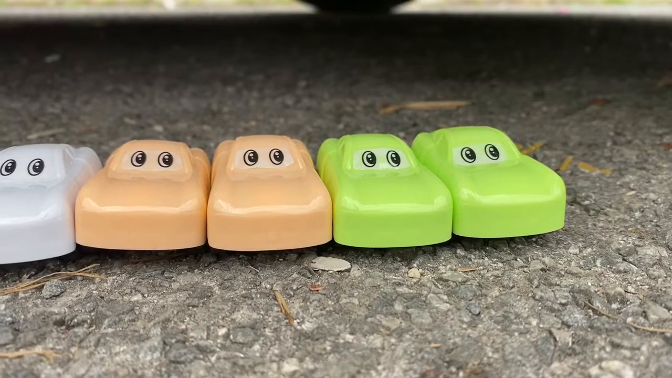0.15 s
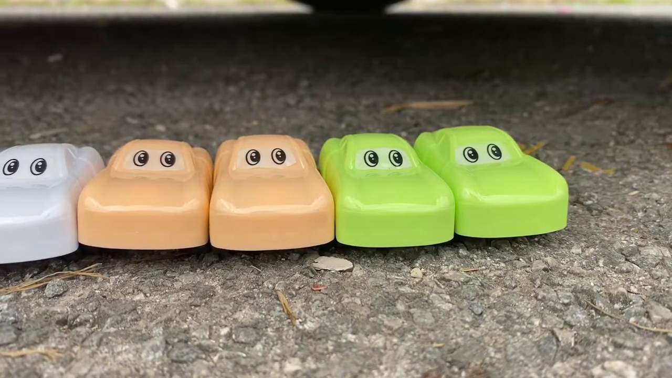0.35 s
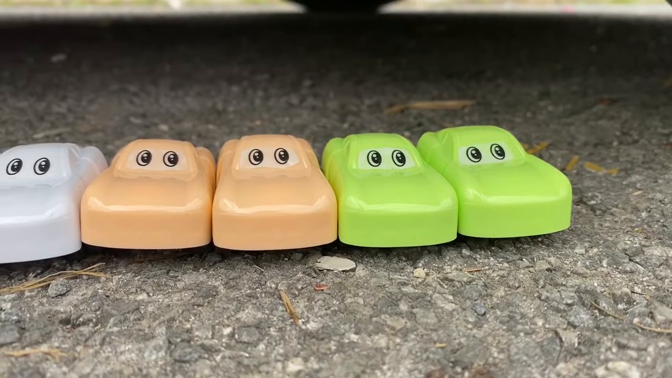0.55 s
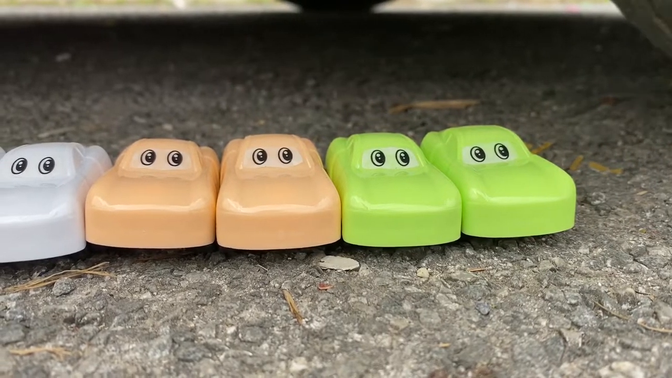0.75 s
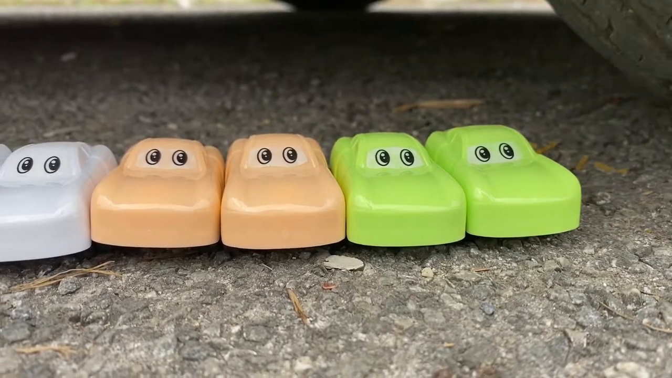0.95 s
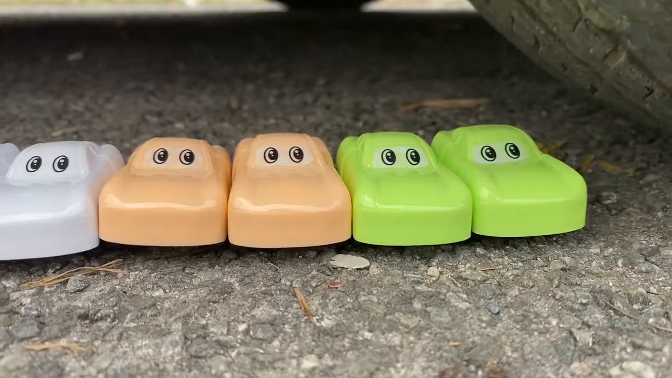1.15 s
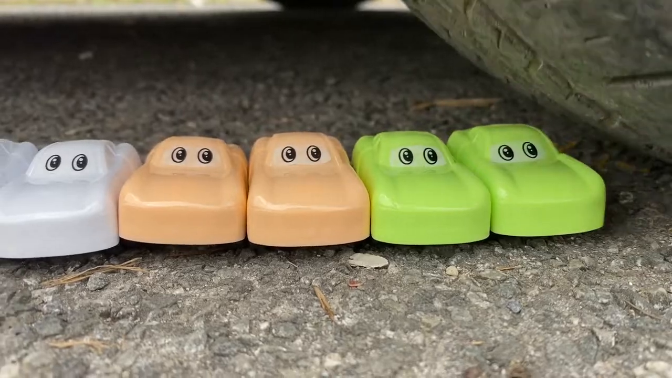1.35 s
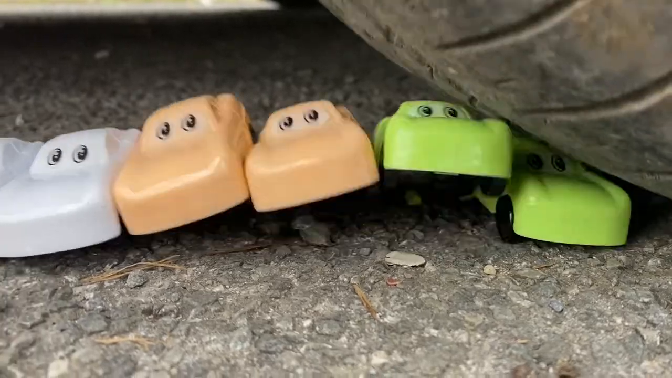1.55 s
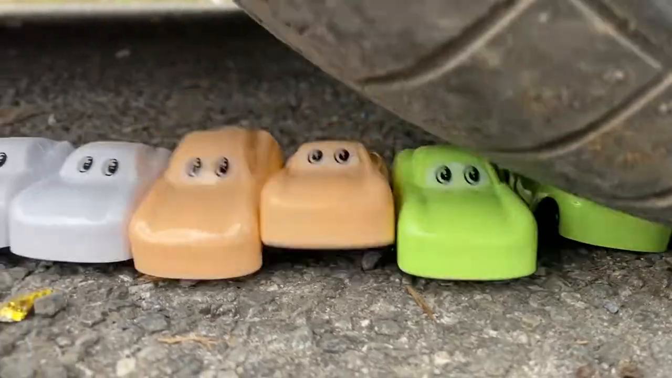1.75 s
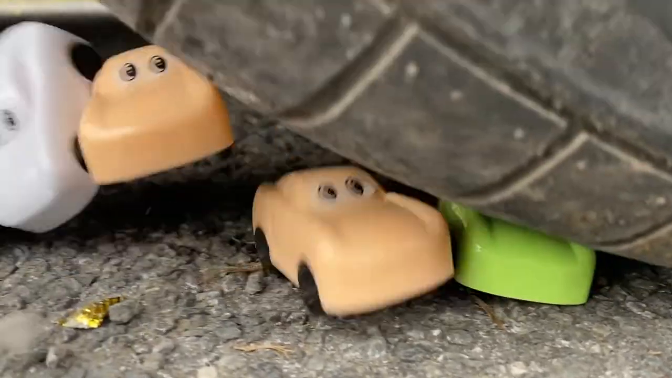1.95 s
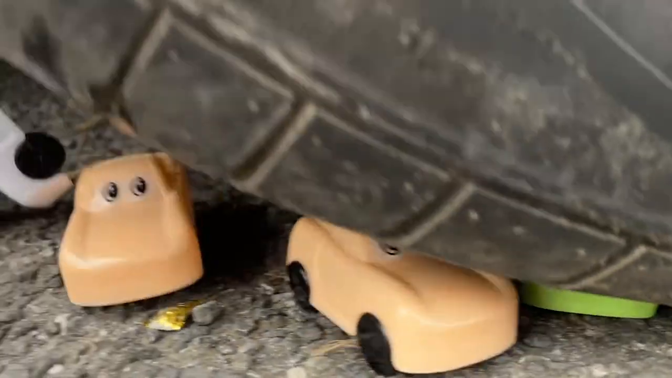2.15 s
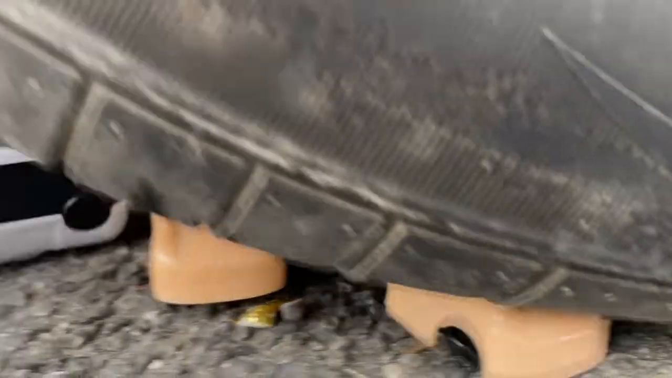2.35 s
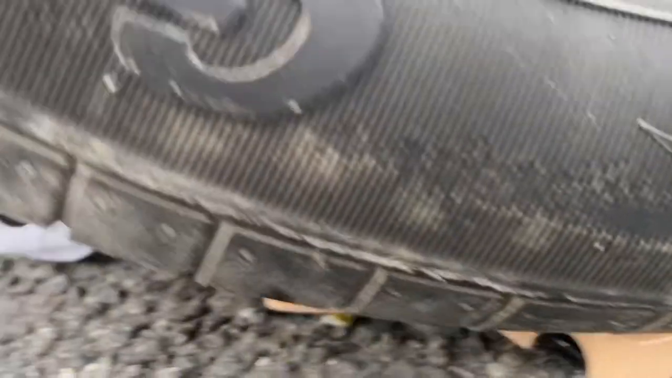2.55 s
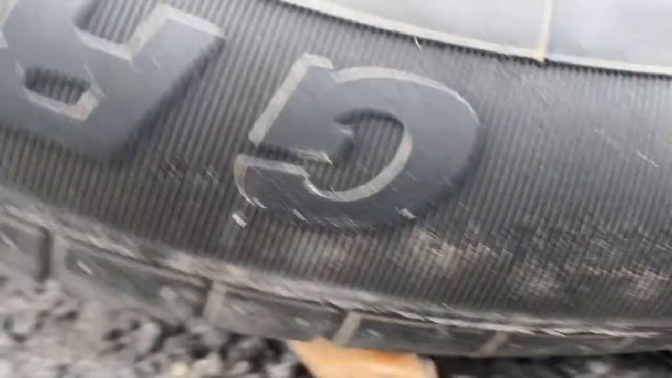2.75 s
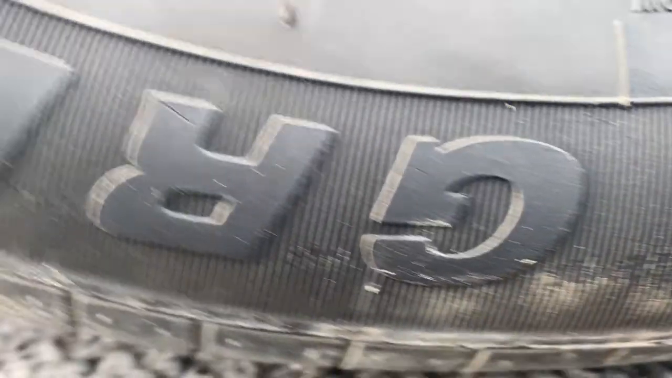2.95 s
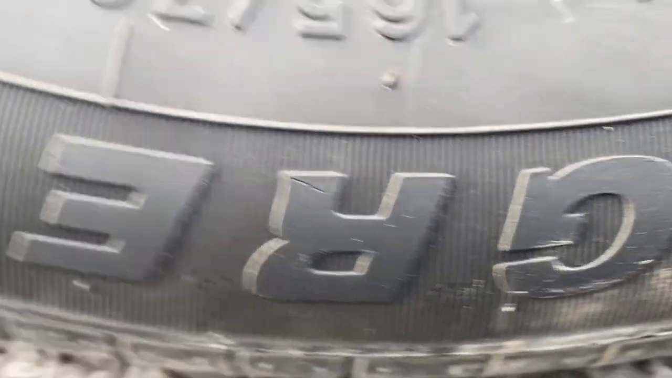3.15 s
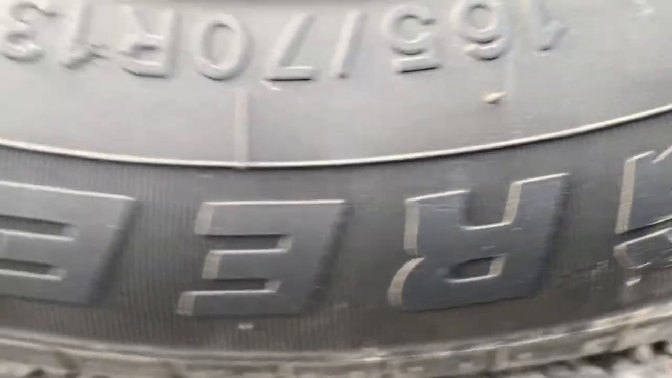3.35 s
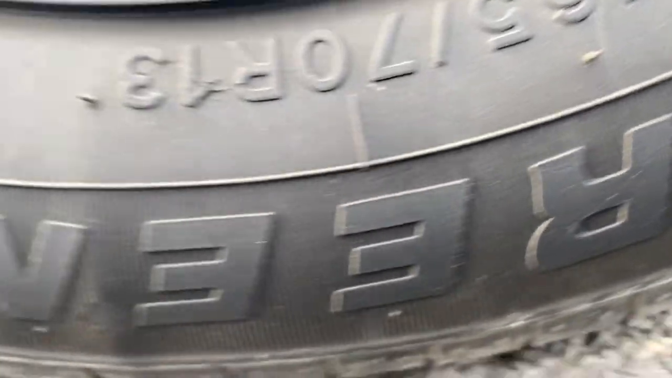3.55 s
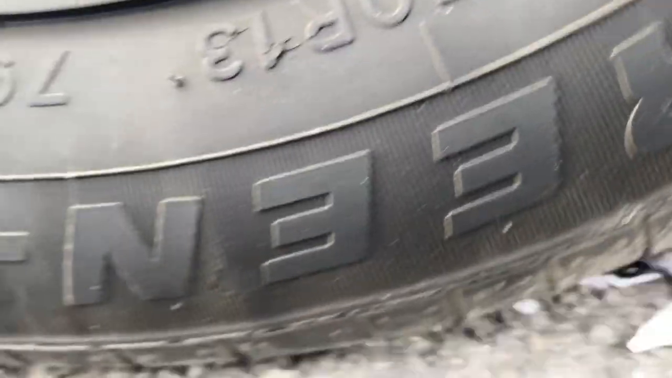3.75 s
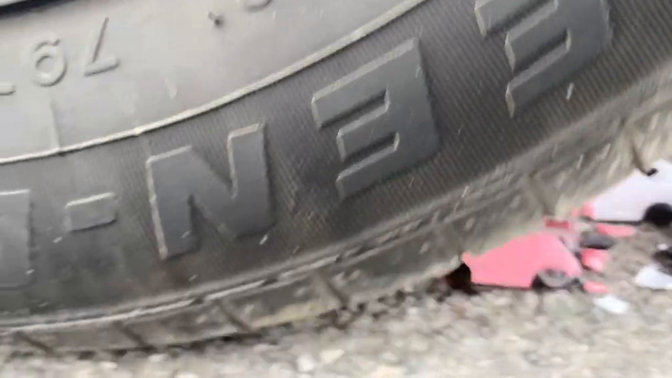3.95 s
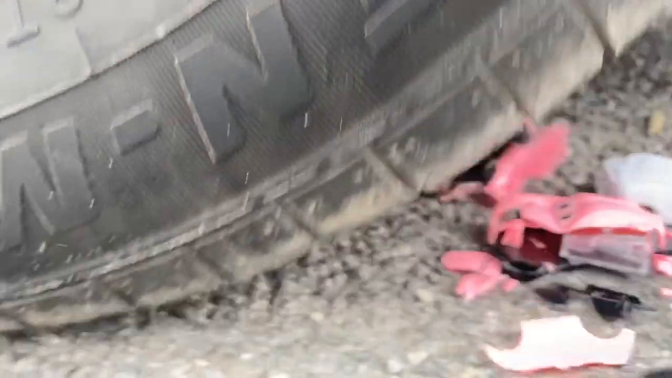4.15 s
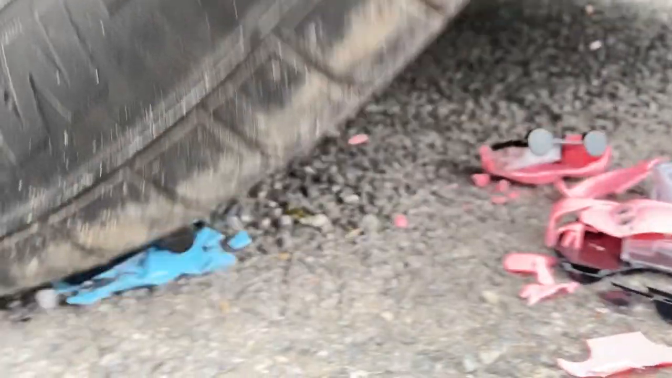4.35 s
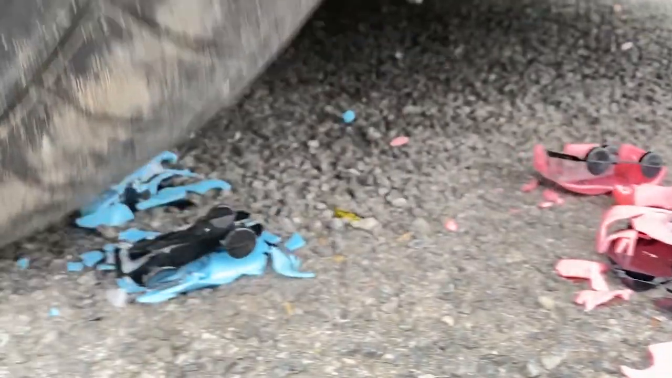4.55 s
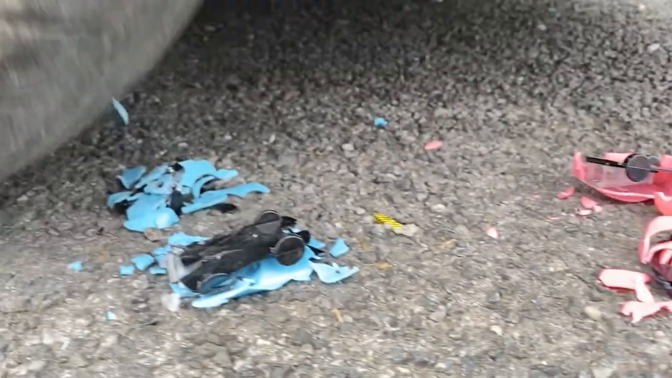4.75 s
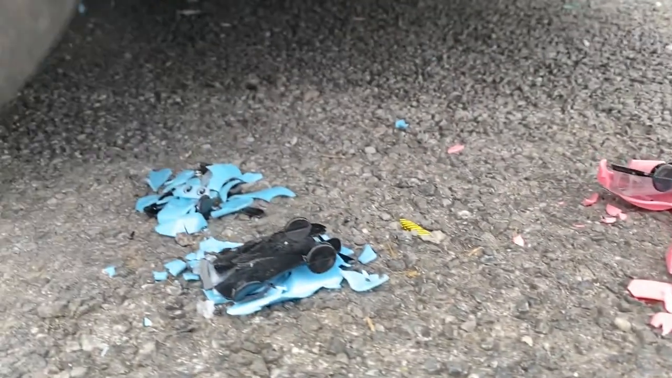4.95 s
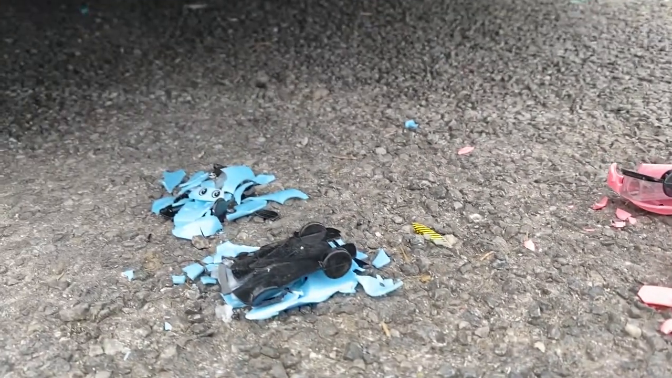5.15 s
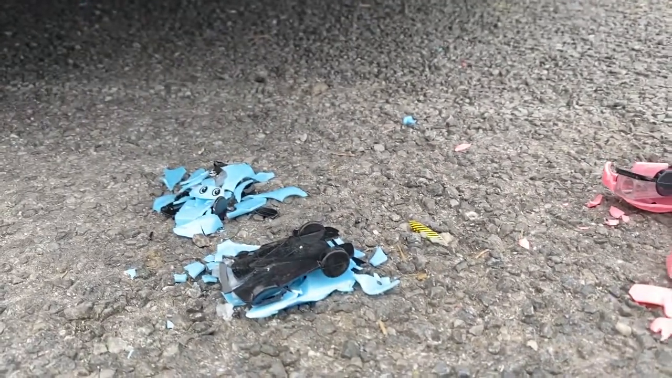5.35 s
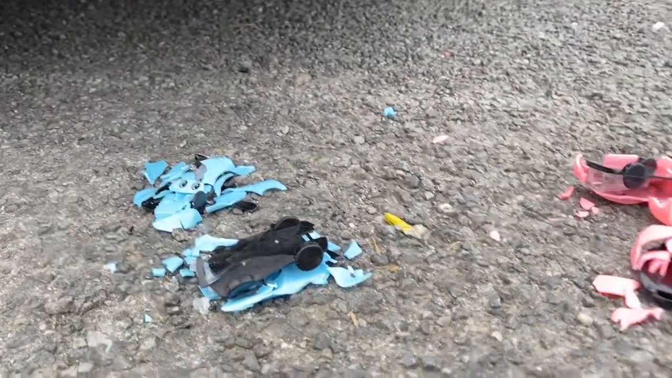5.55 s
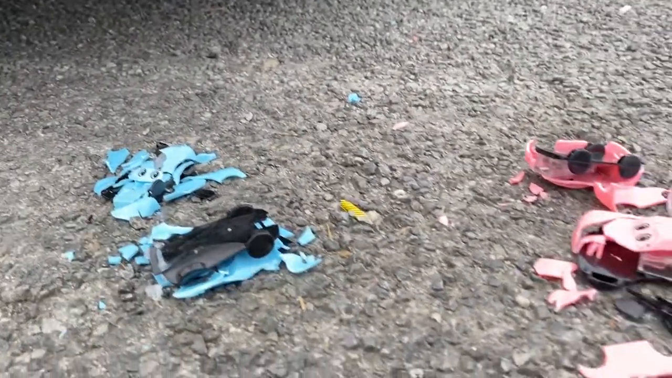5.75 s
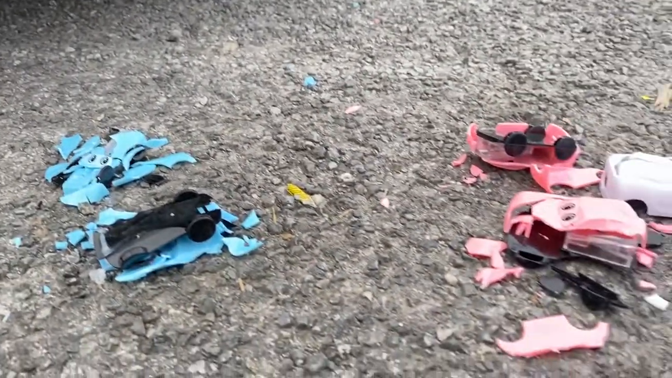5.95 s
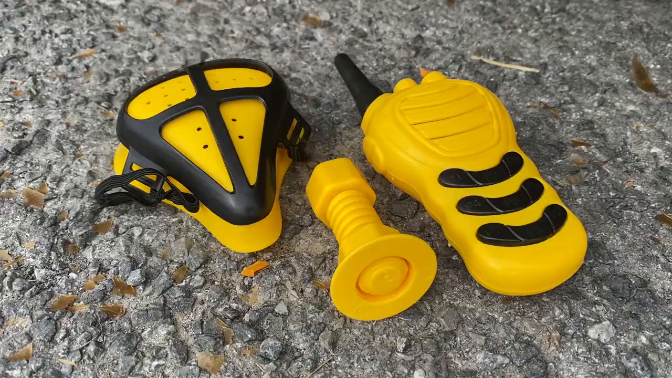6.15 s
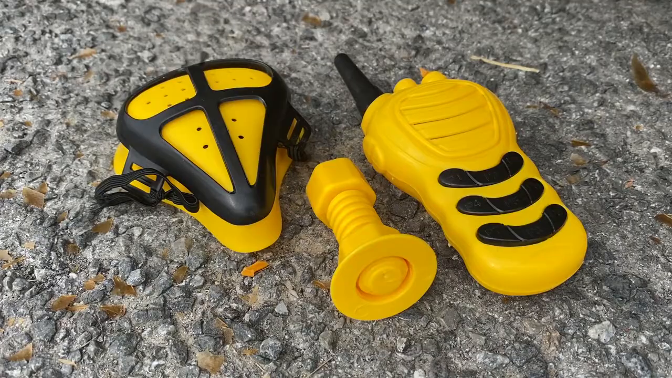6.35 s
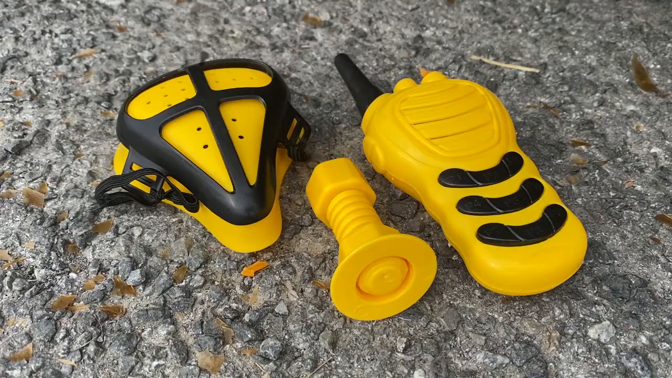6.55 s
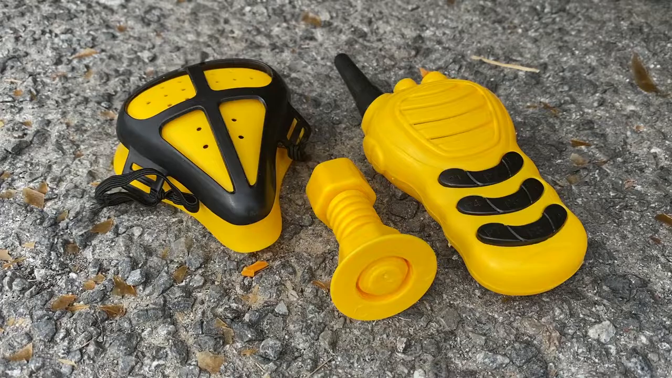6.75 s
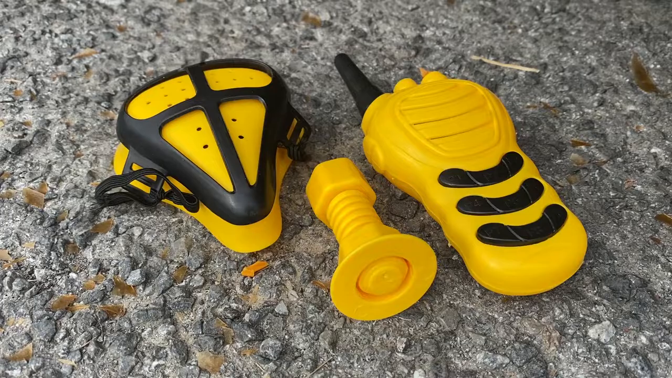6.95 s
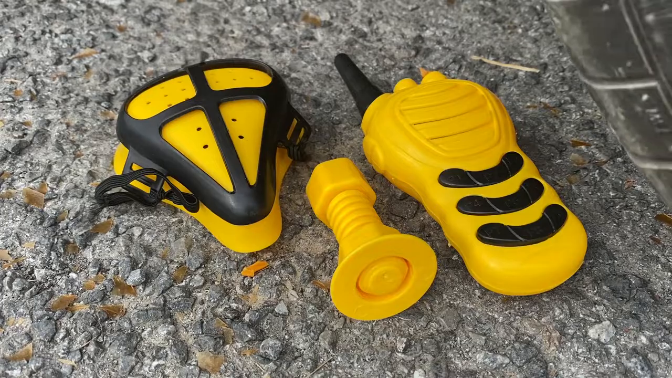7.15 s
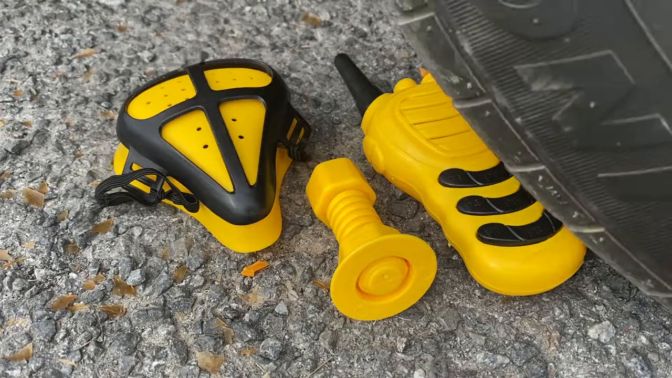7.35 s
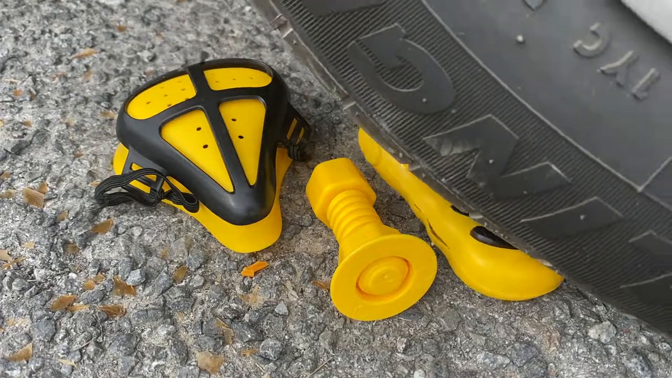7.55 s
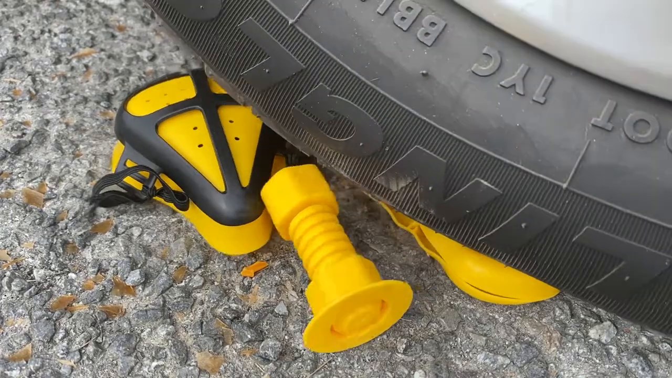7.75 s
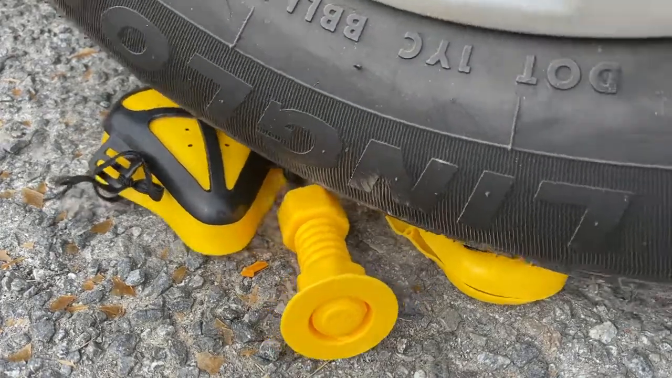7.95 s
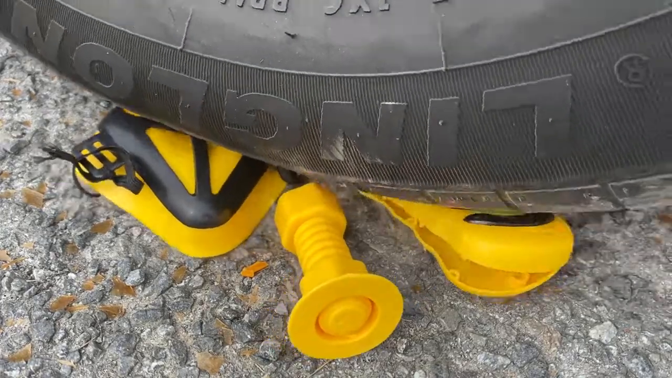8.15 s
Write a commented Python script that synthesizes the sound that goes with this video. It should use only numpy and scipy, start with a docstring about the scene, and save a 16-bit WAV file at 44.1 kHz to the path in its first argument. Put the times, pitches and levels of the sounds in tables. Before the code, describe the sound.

Outdoors on asphalt, close stereo microphone. A car idles in slowed, dull motion with a soft mechanical hiss. The tyre creaks on hollow plastic toys, then breaks them in a dense run of snaps, hollow booms, low thumps and crackling splinters. It thins to a quiet dull background with small pieces bouncing and ticking. A sudden cut brings a brighter, faster idle, one or two ticks, a brief squeak and a shorter burst of sharp cracks.

```python
"""Car tyre over hollow plastic toys

On asphalt, a car idles near a two-port microphone, then its tyre crushes plastic toys: plastic snaps,
hollow shells boom, the tyre thumps, and splinters crackle. Shaped noise makes the engine, breaks and debris;
sine waves make the firing, creaks, booms, thumps, knocks and hums. The first passage plays at half speed and
gradually changes to a quieter, duller background during the crushing; the second, at full speed, starts on the idle."""
import sys
import numpy as np
from scipy import signal
from scipy.fft import rfft, irfft
from scipy.io import wavfile
from scipy.ndimage import uniform_filter1d

SR = 44100
rng = np.random.default_rng(int(sys.argv[2]) if len(sys.argv) > 2 else 0)


def waveform_to_disk(signal):
    """Save audio, clipped to [-1, 1], as 16-bit WAV at the path in sys.argv[1]."""
    frames = np.transpose(np.atleast_2d(signal))
    scaled = np.clip(frames, -1, 1) * 32767
    samples = np.round(scaled).astype(np.int16)
    wavfile.write(sys.argv[1], SR, samples)


N = 361575

# Passages: start_s, end_s, playing_speed (share of full), top_hz (stopband edge as heard),
# scatter_rad (phase spread between ears), engine_cycle_hz (as heard), firing_s (moment of one firing)
PASSAGES = [(0, 6.145, 0.5007, 10270, 0.85, 10.52, .06), (6.151, 8.2, 0.99, 17500, 0.26, 21.37, 6.18)]
SECOND_START_S = PASSAGES[1][0]

# Engine noise, sinking during the crushing: time_s, level_db (before resonances and ports)
ENGINE_NOISE_LEVEL = [(0, -31.5), (1.45, -33), (1.75, -48.5), (2.1, -35), (2.35, -48), (3.4, -45),
                      (4.3, -46), (4.42, -60), (4.7, -61.5), (6.142, -64), (6.152, -35.5), (7.45, -36.5),
                      (7.7, -45), (7.95, -55)]
# Engine firing waves: multiple (of the engine cycle), level_db (relative)
FIRING_ORDERS = [(3, -9), (4, -5), (5, -3), (6, 0)]
# Idling engine noise at half speed: pitch_hz (as heard), density_db (per Hz, relative)
IDLING_COLOUR = [(30, -13.5), (60, -7.5), (130, -7.5), (350, -11.5), (700, -14), (1200, -21.5), (2200, -25),
                 (3600, -28), (6200, -36), (7500, -27.5), (9000, -30)]
# Duller background at half speed: pitch_hz (as heard), density_db (per Hz, relative)
DULL_COLOUR = [(30, -4), (60, 1.5), (130, -8), (250, -1.5), (450, -4), (1000, -13), (1500, -13.5),
               (6200, -25), (7500, -17), (9000, -20)]
# Narrow resonances in the engine noise: pitch_hz (as heard), added_gain_db, passage (0 half speed, 1 full)
WHINES = [(1046, 1.5, 0), (1232, 4.1, 1)]
# Firing level in each passage: (level_db at IDLING_DB, dB lost for each dB the noise sinks below it)
FIRING_FOLLOW, IDLING_DB = [(-38, 1.8), (-33, 0.68)], -33.5
DULLING_MIDDLE_S = 3.0   # middle of the gradual change to the duller background

# Breaks given a snap and a falling knock, no shell boom: start_s, snap_peak_db (before the ports)
TICKS = [(0.813, -9), (1.565, -11.5), (1.5747, -2), (1.618, -6), (1.7441, -13), (1.8177, -19), (1.909, -9),
         (1.9552, -11.5), (2.2, -17), (2.237, -13.5), (2.2548, -3.5), (2.301, -8), (2.326, -14.5),
         (2.4171, -3), (2.425, -6.5), (2.4651, -3.5), (2.522, -7), (2.5693, -2.5), (2.619, -4.5),
         (2.624, -9), (2.6409, 0), (2.668, -11.5), (2.706, -8), (2.766, -5), (2.877, -4.5), (2.8912, 1.5),
         (2.9257, 0.5), (2.967, 7), (3.018, -8), (3.06, -16.5), (3.072, -15.5), (3.1128, 0.5),
         (3.129, -0.5), (3.137, -1.5), (3.1832, -16), (3.2049, 0), (3.2319, 2.5), (3.266, -4), (3.348, -13),
         (3.5961, -3.5), (3.675, -2.5), (3.686, 4), (3.7, 5), (3.7111, 0), (3.8238, 3), (3.8446, 0.5),
         (3.8994, -14.5), (3.9185, -0.5), (3.9775, -1), (4.0044, -1), (4.043, -16), (4.266, -28),
         (6.871, -16), (7.249, -11.5), (7.5068, -2.5), (7.5496, -0.5), (7.595, -21), (7.6154, 1),
         (7.675, 3.5), (7.791, -10), (7.8304, -6.5), (8.014, -26), (8.146, -21.5), (8.165, -18),
         (8.174, -21.5)]
# Plastic shells breaking: start_s, snap_peak_db (before the ports), shell_peak_db (before the left-right
# tilt), shell_pitch_hz (as heard, before tuning scatter), thump_db (before its rise and decay)
CRACKS = [(1.53, 1.5, -12.5, 230, -10), (1.6484, -0.5, -10.5, 315, -23.5), (1.874, 1.5, -10.5, 306, -21.5),
          (1.9689, -4.5, -17.5, 436, -21.5), (2.015, -1, -7, 382, -23), (2.0616, -4, -10, 434, -24),
          (2.1105, 4, -5, 383, -18.5), (2.3792, 1, -11, 249, -20), (2.494, -4.5, -28, 300, -20.5),
          (2.541, 3, -15.5, 588, -20.5), (2.682, -8.5, -18, 565, -27), (2.738, 4.5, -9.5, 375, -33),
          (2.823, 6, -29, 336, -21), (3.0798, 0.9, -25, 332, -31), (3.1003, 3.5, -9, 497, -35.5),
          (3.289, 4.5, -8, 310, -32), (3.4293, 1, -13.5, 343, -27), (3.4964, -3.5, -7.5, 433, -30.5),
          (3.76, 5, -18.5, 485, -32), (4.094, -0.5, -6, 370, -21), (4.1927, 2, -15, 334.6, -31.5),
          (7.6372, 1, -23, 330, -15), (7.7311, 3, -14.5, 650, -12.5), (7.8942, 0, -11, 900, -11.5),
          (8.0518, 0, -13.5, 795, -12.5)]
# Snap colour at full speed: pitch_hz, density_db (per Hz, relative)
SNAP_COLOUR = [(130, -26.5), (400, -8), (800, -4.5), (1600, -11), (4800, -10.5), (13000, -14.5),
               (16000, -7.5)]
PIECE_HZ, PIECE_DB = (2180, 8960), 6   # range of a piece's favoured pitch at full speed, added gain
# Knock against its snap; settled pitch and extra pitch at the start, at half speed; t60 at half speed
KNOCK_DB, KNOCK_SETTLED_HZ, KNOCK_EXTRA_HZ, KNOCK_T60_S = -14.5, 243, 900, 0.031
SHED_DB, SHED_T60_S = (-32.5, -55), 0.27   # splinters against the breaks in each passage, dying time

# Rubber creaking on plastic before it gives: start_s, end_s, slip_hz, partials (count),
# level_db (before swell and grip), loudest (share of its length)
CREAKS = [(1.474, 1.492, 862, 1, -17.5, 0.25), (1.5, 1.536, 779, 4, -16.5, 0.83),
          (7.428, 7.461, 1000, 2, -27, 0.59), (7.475, 7.495, 800, 2, -23, .2)]
# Hollow shell modes: multiple (of shell pitch), level_db (relative), t60_cycles
SHELL_MODES = [(.62, -6, 9.0), (1, 1, 12.5), (1.55, -1.5, 20)]

# Faint hums late in the first passage: start_s, pitch_hz (as heard), level_db (at the start, before waver), t60_s
HUMS = [(4.25, 133.4, -56, 2.66), (4.3, 409, -66.5, 26)]
# Pieces settling afterwards: start_s, peak_db (before the ports), pitch_hz (as heard)
SETTLING = [(4.251, -38, 7090), (4.485, -34.5, 5240), (4.503, -36.5, 3670), (5.65, -47, 937),
            (5.792, -42.5, 1073)]
SETTLE_CYCLES = 26   # t60 of the first scratch, in cycles of the piece
ROCK_DB, ROCK_T60_S = -14.5, 0.35   # softer rattle that lasts on
BOUNCE_S, BOUNCE_GAP_S, BOUNCE_SHRINK = 4.282, .0222, .74   # first touch, first gap, ratio of gaps
BOUNCE_DB, BOUNCE_LOSS_DB = -19.5, 2   # first touch, loss at each next touch

# Likeness of the two microphone ports: pitch_hz (at full speed), likeness (0 to 1)
PORT_LIKENESS = [(120, 0.92), (1000, 0.4), (3000, 0.25), (6000, 0.35), (7200, 0.77), (11000, 0.95)]
LAG_FROM_HZ, LAG_S = 6160, .000254   # left-port lag and where it begins, at full speed
CUTOFF_HZ = 16950   # stopband edge for both passages


def amp(db):
    """Decibels to gain."""
    return 10 ** (np.asarray(db) / 20)


def rms_one(x):
    """Scale to rms 1."""
    return x / np.sqrt(np.mean(x ** 2) + 1e-20)


def peak_one(x):
    """Scale to height 1."""
    return x / np.max(np.abs(x))


def at_hz(points, hz):
    """Read a table on a log-frequency axis."""
    table_hz, values = np.array(points).T
    return np.interp(np.log(hz + 1), np.log(table_hz), values)


def coloured(spectrum, size, speed=1, ripple_db=0):
    """Two unrelated noises of one colour, with random resonant peaks; rms 1."""
    hz = np.fft.rfftfreq(size, 1 / SR) / speed
    ripple = np.interp(hz, np.linspace(0, SR, 220), rng.standard_normal(220))
    shape = amp(at_hz(spectrum, hz) + ripple_db * ripple) * (hz > 25)
    white = rng.standard_normal((2, size))
    return rms_one(irfft(rfft(white) * shape, size))


def resonance(x, hz, q):
    """A single resonance of peak gain 1; q is pitch over bandwidth."""
    return signal.lfilter(*signal.iirpeak(hz, q, SR), x)


def add(into, s, sound):
    """Mix a two-row sound in at s seconds."""
    i = round(s * SR)
    into[:, i:i + sound.shape[1]] += sound[:, :N - i]


def passage_at(s):
    """Which passage a moment falls in."""
    return (np.asarray(s) >= SECOND_START_S).astype(int)


def speed_at(s):
    """Playing speed and phase scatter between ears at a moment."""
    passage = PASSAGES[int(s >= SECOND_START_S)]
    return passage[2], passage[4]


def firing(cycle_hz, firing_s):
    """Waves at multiples of the engine cycle, each firing sweeping upward, the low ones first; all waver."""
    t, out = np.arange(N) / SR, 0
    for k, db in FIRING_ORDERS:
        waver = np.interp(t, np.linspace(0, t[-1], 70), rng.standard_normal(70))
        sweep_rad = 0.33 * (k - 6) ** 2
        out = out + amp(db + 1.8 * waver) * np.cos(2 * np.pi * k * cycle_hz * (t - firing_s) - sweep_rad)
    return rms_one(out)


def whining(noise, passage):
    """Narrow resonances, 25 Hz wide, lifted out of the engine noise."""
    for hz, db, heard_in in WHINES:
        if round(heard_in) == passage:
            noise = noise + amp(db) * resonance(noise, hz, hz / 25)
    return noise


def engine(firing_db, noise_db):
    """Firing waves over mechanical noise; the half-speed noise changes gradually to a duller colour."""
    t = np.arange(N) / SR
    full = t >= SECOND_START_S
    dulling = np.clip((t - DULLING_MIDDLE_S) / 3 + .5, 0, 1)
    idling_noise = coloured(IDLING_COLOUR, N, ripple_db=3.5)
    dull_noise = coloured(DULL_COLOUR, N)
    slow_noise = whining(np.sqrt(1 - dulling) * idling_noise + np.sqrt(dulling) * dull_noise, passage=0)
    full_noise = whining(coloured(IDLING_COLOUR, N, 1.957, ripple_db=2.5), passage=1)
    noise = np.where(full, full_noise, slow_noise)
    tones = np.where(full, firing(*PASSAGES[1][5:]), firing(*PASSAGES[0][5:]))
    return amp(noise_db) * noise + amp(firing_db) * tones * [[1], [.6]]   # rows: shared, apart


def piece(x, speed):
    """A broken piece lifts one broad resonance, drawn by chance."""
    hz = speed * np.exp(rng.uniform(*np.log(PIECE_HZ)))
    return x + amp(PIECE_DB) * resonance(x, hz, 4.5)


def snaps(table, tear_s, tail_db):
    """Each break is a quick run of uneven fractures for a few milliseconds, then dies away under the car."""
    out = np.zeros((2, N))
    for s, snap_db, *_ in table:
        speed = speed_at(s)[0]
        t = np.arange(5000) / SR * speed   # time at full speed
        tear = tear_s * rng.uniform(.8, 1.3)
        # spiky from one half millisecond to the next
        fractures = np.repeat(amp(3.33 * np.minimum(rng.exponential(1, 250), 3)), 20)
        fall_db = -6.0 * t / tear - 60 * np.maximum(t - tear, 0) / 0.0061
        burst = fractures * (1 - np.exp(-t / .0004)) * amp(fall_db)
        crack = coloured(SNAP_COLOUR, 5000, speed, ripple_db=2.0)
        echo = coloured(SNAP_COLOUR, 5000, .45 * speed, ripple_db=3.5)
        dull_echo = signal.lfilter([1], [1, -.6], echo)
        tail = amp(tail_db - 60 * t / speed ** 0.6 / 0.069) * dull_echo
        snap = piece(burst * crack + np.sqrt(fractures) * tail, speed)
        add(out, s, amp(snap_db) * peak_one(snap))
    return out


def knocks():
    """A break jolts the toy: a dull knock whose pitch drops fast."""
    out = np.zeros((2, N))
    for (s, db), (tuning, strength, ear) in zip(TICKS, rng.standard_normal((len(TICKS), 3))):
        speed, scatter = speed_at(s)
        t = np.arange(4000) / SR * 2 * speed   # time at half speed
        drop_cycles = KNOCK_EXTRA_HZ * 0.00403 * (1 - np.exp(-t / .004))
        cycles = amp(2.5 * tuning) * (KNOCK_SETTLED_HZ * t + drop_cycles)
        level = amp(db + KNOCK_DB + 2 * strength - 60 * t / KNOCK_T60_S)
        wave = np.sin(2 * np.pi * cycles + scatter * ear * np.array([[1], [0]]))
        add(out, s, level * wave * (1 - np.exp(-t / 0.0037)))
    return out


def shedding():
    """Every break leaves splinter energy that dies away; returned as gain."""
    energy = np.zeros(N)
    for s, snap_db, *_ in CRACKS + TICKS:
        energy[round(s * SR)] = amp(2 * (snap_db + SHED_DB[passage_at(s)]))
    decay = amp(-120 / (SHED_T60_S * SR))   # energy falls at twice the dB of gain
    return np.sqrt(signal.lfilter([1], [1, -decay], energy + 1e-18))


def splinters(level):
    """Four pieces' fragments crackle at random over a faint hiss that rises with each break and dies away."""
    strength = amp(4.0 * np.minimum(rng.exponential(1, (4, N)), 3))
    clicks = (rng.random((4, N)) < 60 / SR) * strength   # about 60 a second for each piece
    bursts = signal.lfilter([1], [1, -amp(-60 / (0.005 * SR))], clicks) + 0.012
    crackle = sum(b * piece(piece(coloured(SNAP_COLOUR, N, 0.49), 0.8), .5) for b in bursts)
    return level * rms_one(crackle)


def creaks():
    """Quick stick-slip: an unsteady, scratchy squeak, some with overtones, that swells and lets go."""
    out = np.zeros((2, N))
    for start, end, hz, partials, db, loudest in CREAKS:
        size = round((end - start) * SR)
        wobble, grip = rms_one(uniform_filter1d(rng.standard_normal((2, size)), size=70))
        turn = 2 * np.pi * np.cumsum(hz * (1 + .1 * wobble)) / SR
        squeak = sum(np.sin(k * turn + rng.uniform(0, 6.7, (2, 1))) for k in range(1, round(partials) + 1))
        swell = np.interp(np.arange(size) / size, [0, np.clip(loudest, 0, 1), 1], [0, 1, 0])
        add(out, start, amp(db + 3.5 * grip) * rms_one(squeak) * swell)
    return out


def booms():
    """The hollow shell swells and rings briefly at the pitch of its size."""
    out, t = np.zeros((2, N)), np.arange(8000) / SR
    rise = 1 - np.exp(-t / 0.004)
    for s, _, shell_db, pitch_hz, _ in CRACKS:
        scatter = speed_at(s)[1]
        turn, strength, tuning, *ears = rng.standard_normal((5, len(SHELL_MODES)))
        shell = 0
        for k, (ratio, db, cycles) in enumerate(SHELL_MODES):
            phase = 3 * turn[k] + scatter * np.array(ears)[:, k, None]
            wave = np.sin(2 * np.pi * pitch_hz * ratio * amp(.3 * tuning[k]) * t + phase)
            shell = shell + wave * amp(db + 2 * strength[k] - 60 * t * pitch_hz * ratio / cycles)
        add(out, s, amp(shell_db) * peak_one(rise * shell))
    return out


def thumps():
    """The tyre drops with a thump whose pitch sags."""
    out, t = np.zeros((2, N)), np.arange(8000) / SR
    for s, *_, db in CRACKS:
        speed, scatter = speed_at(s)
        own = t * speed ** 0.78   # the thump's own time, slowed less than the playing speed
        cycles = 55 * own + 420 * .0055 * (1 - np.exp(-own / 0.006))
        wave = np.sin(2 * np.pi * cycles + 0.78 * scatter * np.array([[1], [-1]]))
        add(out, s, (1 - np.exp(-own / 0.0022)) * wave * amp(db - 60 * own / 0.13))
    return out


def hums():
    """Soft narrow tones that fade, wavering for their first two seconds at most."""
    out = np.zeros((2, N))
    for start, hz, db, t60 in HUMS:
        t = np.arange(round((PASSAGES[0][1] - start) * SR)) / SR
        waver = np.interp(t, np.linspace(0, 2, 24), rng.standard_normal(24))
        tone = amp(db - 60 * t / t60 + 1.7 * waver) * np.sin(2 * np.pi * hz * t)
        add(out, start, tone * np.ones((2, 1)))
    return out


def settling():
    """A short scratch of noise sets a small piece ringing at its own pitch; it rattles on softly."""
    out, t = np.zeros((2, N)), np.arange(9000) / SR
    for s, db, hz in SETTLING:
        # uneven from touch to touch
        rattle = np.repeat(amp(5.2 * np.minimum(rng.exponential(1, 90), 2) - 6.5), 100)
        level = amp(-60 * t * hz / SETTLE_CYCLES) + rattle * amp(ROCK_DB - 60 * t / ROCK_T60_S)
        scratch = rng.standard_normal((2, len(t))) * level
        add(out, s, amp(db) * peak_one(0.18 * scratch + resonance(scratch, hz, 2.6)))
    return out


def bounces():
    """Times and snap levels of a bounce: each touch comes sooner and softer than the last."""
    touch = np.arange(7)
    s = BOUNCE_S + BOUNCE_GAP_S * (1 - BOUNCE_SHRINK ** touch) / (1 - BOUNCE_SHRINK)
    return np.transpose([s, BOUNCE_DB - BOUNCE_LOSS_DB * touch])


def ports(shared, apart, speed):
    """The ports differ most in the middle range, louder on the left; treble reaches the left one late."""
    hz = np.fft.rfftfreq(len(shared), 1 / SR) / speed
    alike = np.clip(at_hz(PORT_LIKENESS, hz), 0, 1)
    mid = np.sqrt((1 + alike) / 2) * rfft(shared)
    side = np.sqrt((1 - alike) / 2) * rfft(apart)
    lag = np.exp(-2j * np.pi * LAG_S * np.maximum(hz - LAG_FROM_HZ, 0))
    left = (mid + side) * amp(2.5 * (1 - alike)) * lag
    return irfft([left, mid - side], len(shared))


def scene():
    """Engine, breaks and debris reach the two ports at each passage's speed; low tones bypass them."""
    t = np.arange(N) / SR
    noise_db = np.interp(t, *np.transpose(ENGINE_NOISE_LEVEL))
    idle_db, follow = np.transpose(FIRING_FOLLOW)[:, passage_at(t)]
    firing_db = idle_db + follow * (noise_db - IDLING_DB)
    breaking = snaps(CRACKS, tear_s=0.0026, tail_db=-13) + snaps(TICKS, tear_s=0.0016, tail_db=-17)
    debris = splinters(shedding()) + snaps(bounces(), tear_s=0.0012, tail_db=-27.5) + settling()
    air = engine(firing_db, noise_db) + breaking + debris + creaks()   # rows: shared, apart
    out = booms() * amp([[1.2], [-1.2]]) + thumps() + knocks() + hums()   # rows: left, right
    for start, end, speed, *_ in PASSAGES:
        part = slice(round(start * SR), round(end * SR))
        out[:, part] += ports(*air[:, part], speed)
    return out


def record(dry):
    """Peaks are rounded; the treble is cut, lower at half speed."""
    out = np.tanh(dry)
    for start, end, _, top_hz, *_ in PASSAGES:
        part = slice(round(start * SR), round(end * SR))
        passage_cut = signal.cheby2(14, 55, top_hz, fs=SR, output="sos")
        out[:, part] = signal.sosfilt(passage_cut, out[:, part])
    return signal.sosfilt(signal.cheby2(12, 70, CUTOFF_HZ, fs=SR, output="sos"), out)


dry = scene()
out = record(dry)
waveform_to_disk(out)
```